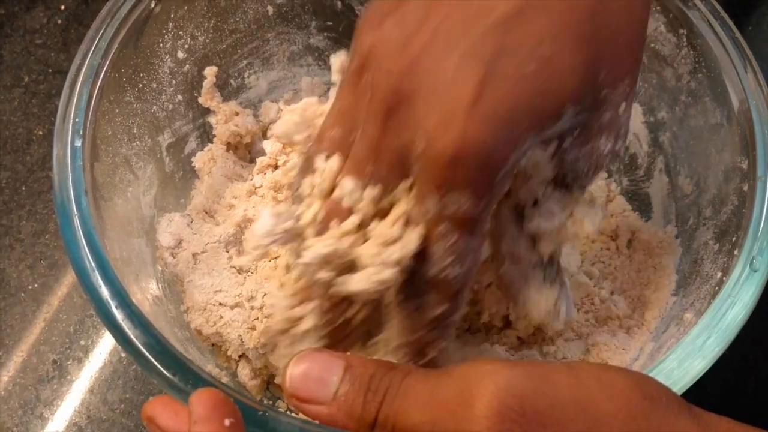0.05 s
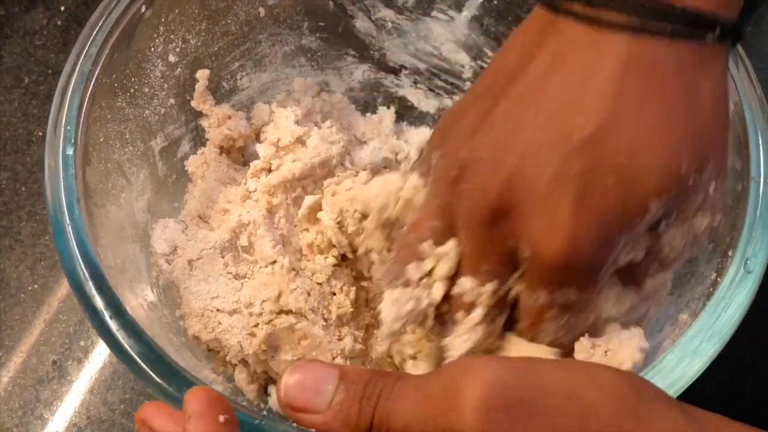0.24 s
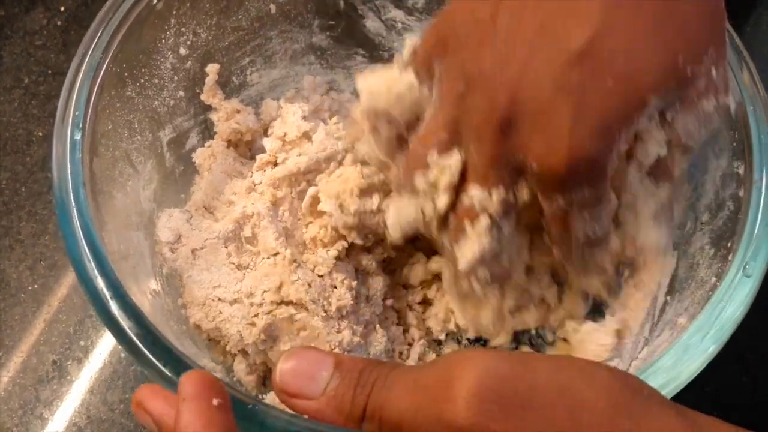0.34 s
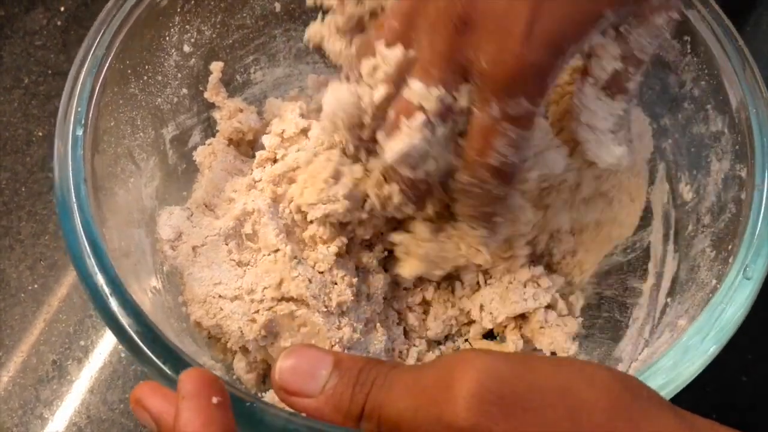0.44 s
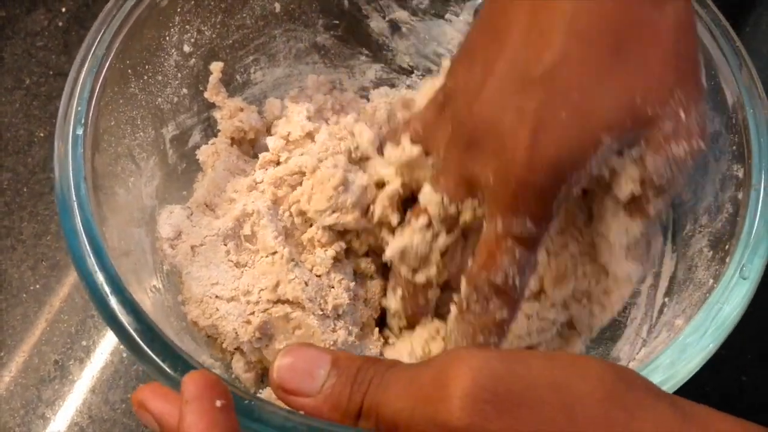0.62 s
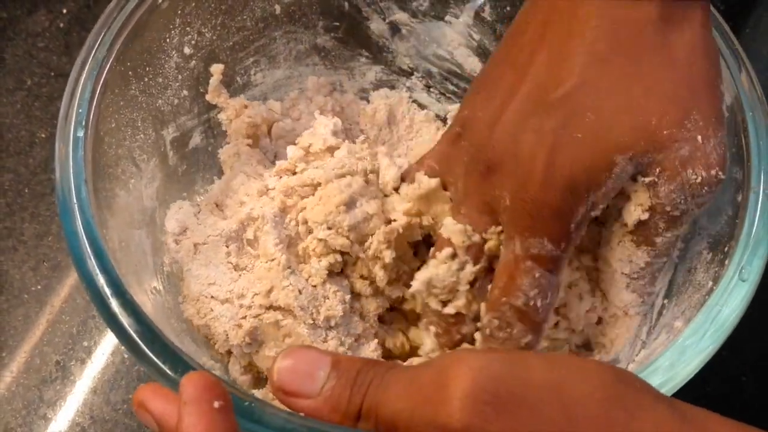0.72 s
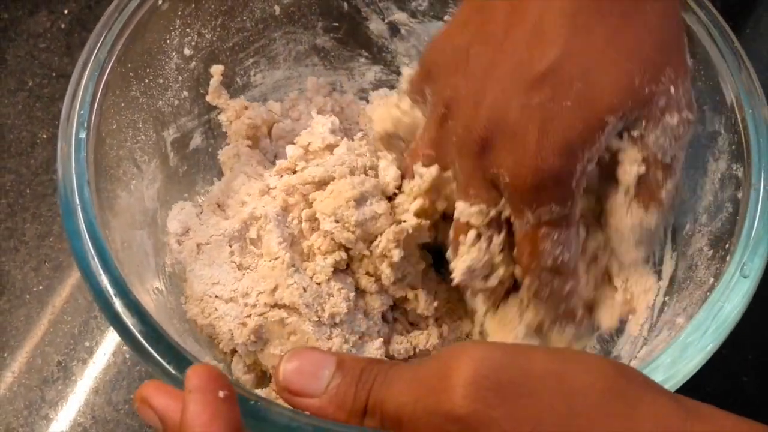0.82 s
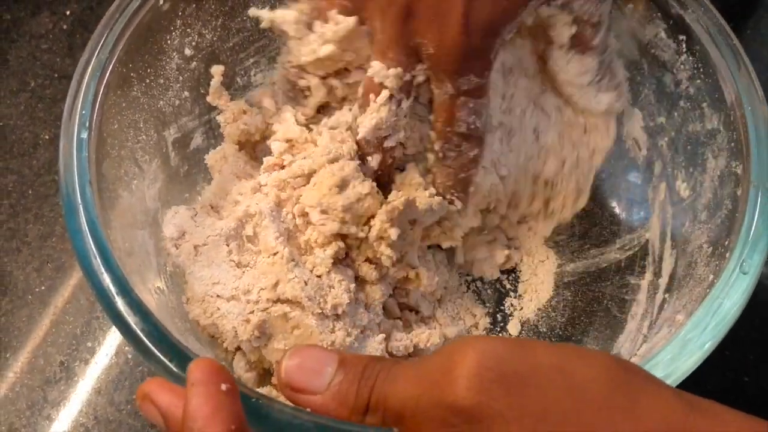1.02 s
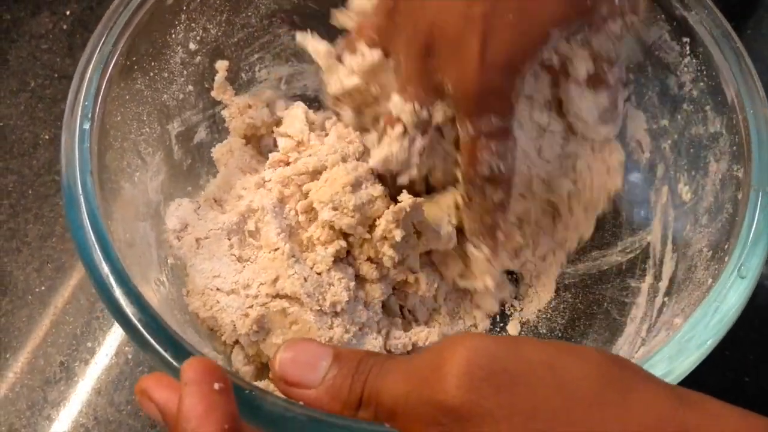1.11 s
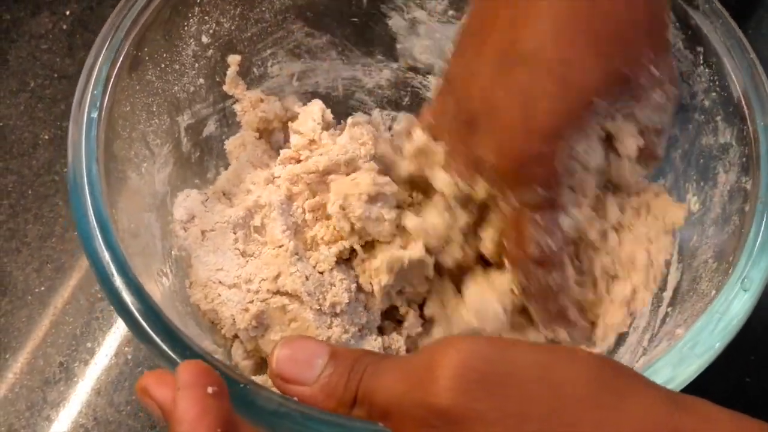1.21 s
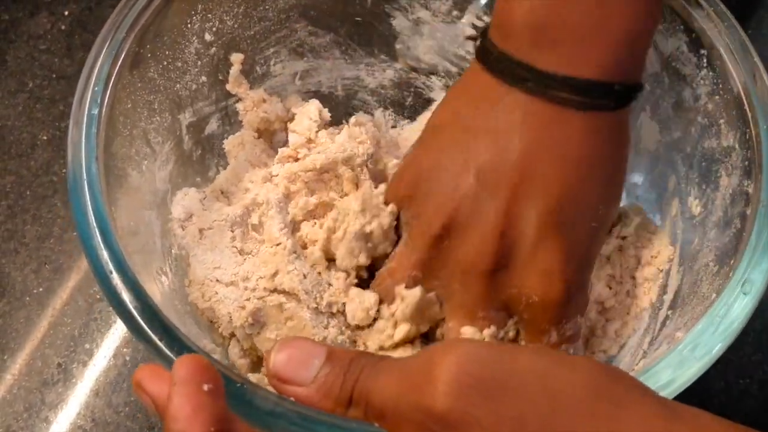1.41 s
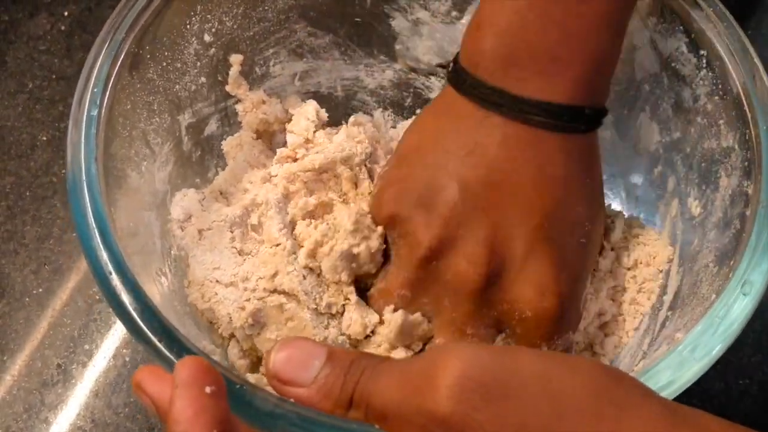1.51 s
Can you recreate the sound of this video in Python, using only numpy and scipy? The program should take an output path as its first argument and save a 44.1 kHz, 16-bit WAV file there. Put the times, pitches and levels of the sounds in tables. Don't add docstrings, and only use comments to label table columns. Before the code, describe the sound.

A hand kneads crumbly dough in a glass bowl with soft rustling and two knocks

```python
import sys
import numpy as np
from scipy import signal
from scipy.io import wavfile

SR = 44100
rng = np.random.default_rng(int(sys.argv[2]) if len(sys.argv) > 2 else 0)


def boost(x):
    u = np.asarray(x, float) / 20
    return 10 ** u


def materialize(psi):
    bounded = np.clip(np.atleast_2d(psi).T, -1, 1)
    quanta = np.round(bounded * 32767).astype(np.int16)
    wavfile.write(sys.argv[1], SR, quanta)


N = 68355
T = np.arange(N) / SR


def rms_one(x):
    return x / np.sqrt(np.mean(x ** 2) + 1e-20)


def at_hz(points, hz):
    points = np.array(points)
    return np.interp(np.log(hz), np.log(points[:, 0]), points[:, 1])


def drift(rate):
    r = np.exp(-80 * np.pi * rate / SR)
    slow = signal.lfilter([1], [1, -2 * r, r * r], rng.standard_normal(N // 40 + 1002))[1000:]
    return np.interp(np.arange(N) / 40, np.arange(len(slow)), rms_one(slow))


def ring(clicks, hz, t60):
    r = boost(-60 / (t60 * SR))
    w = 2 * np.pi * min(hz, .45 * SR) / SR
    return signal.lfilter([0, np.sin(w)], [1, -2 * r * np.cos(w), r * r], clicks + 1e-18)


# f/Hz, correlation
LIKENESS = [(60, 0.89), (180, 0.96), (550, 0.62), (1650, -0.13), (4970, 0.01), (15000, 0.73)]
EDGES = 22 * 2 ** np.arange(0, 9.7, .4)


def bands(white):
    for k, (low, high) in enumerate(zip(EDGES, EDGES[1:])):
        band = signal.butter(2, [low, high], "band", fs=SR, output="sos")
        mid, side = signal.sosfilt(band, white[k % 2])
        hz = np.sqrt(low * high)
        alike = np.clip(at_hz(LIKENESS, hz), -1, 1)
        yield hz, np.sqrt(1 + alike) * mid + np.sqrt(1 - alike) * side * [[1], [-1]]


def coloured(white, spectrum, patchy_db):
    together = drift(7.6)
    out = np.zeros((2, N))
    for hz, pair in bands(white):
        flicker = 1.06 * together + drift(14)
        out += boost(at_hz(spectrum, hz) + patchy_db * flicker) * pair
    return out / np.sqrt(np.mean(out.mean(axis=0) ** 2))


def grains():
    grains_per_s, spread_db, share = 2000, 3.0, .3
    shape = (2, 2, N)
    sizes = boost(spread_db * np.minimum(rng.exponential(1, N), 5))
    sizes = sizes * (rng.random(N) < grains_per_s / SR)
    clicks = rms_one(sizes) * rng.choice([-1, 1], shape)
    return np.sqrt(share) * clicks + np.sqrt(1 - share) * rng.standard_normal(shape)


# t/s, flour hiss level/dB, rub on the glass level/dB, press of the dough level/dB
STROKES = [(0, -68, -70, -92), (.06, -69.5, -68.5, -70), (.2, -56, -61.5, -65.5), (.42, -97, -66, -80),
           (0.478, -54, -61, -55), (.56, -62, -60, -54.5), (0.649, -60.5, -56.5, -67.5),
           (.7, -65.5, -71, -90), (.76, -57, -59, -59.5), (.85, -54, -61, -55.5), (.9, -67, -73, -71),
           (.96, -70, -79, -60.5), (0.998, -51.5, -62.5, -75), (1.078, -54, -54.5, -52),
           (1.18, -57.5, -61, -65.5), (1.27, -60, -63.5, -53.5), (1.33, -67.5, -72.5, -91),
           (1.55, -67.5, -89, -89)]
# f/Hz, level/dB per Hz
HISS = [(2000, -35), (4000, -35), (7000, 6), (12000, 0), (16500, 3)]
# f/Hz, level/dB per Hz
RUB = [(700, -13), (1500, 1.5), (3000, 4), (6000, -3), (10000, 1), (16000, -22)]
# f/Hz, level/dB per Hz
PRESS = [(120, -27), (250, -12.5), (600, 6), (1000, -1.5), (1600, -13), (3000, -31)]


def rustle():
    t, *levels_db = np.transpose(STROKES)
    white = grains()
    out = np.zeros((2, N))
    for k, (db, colour) in enumerate(zip(levels_db, (HISS, RUB, PRESS))):
        shifted = np.roll(white, 999 * k, axis=2)
        out += boost(np.interp(T, t, db)) * coloured(shifted, colour, 1.0)
    return out


# t/s, peak level/dB, f/Hz, ring/cycles
SNAPS = [(.0094, -44, 4620, 73), (.0174, -39.5, 15400, 29), (.612, -49, 14400, 36), (.635, -49, 5000, 41),
         (.848, -47, 3500, 21), (1.2755, -50, 13500, 30), (1.354, -76, 14600, 23), (1.359, -43, 13600, 30),
         (1.3854, -67, 14200, 23), (1.5024, -63.5, 13570, 34), (1.5415, -44.5, 2830, 5.3),
         (1.544, -37, 6650, 10)]


def snaps():
    out = np.zeros(N)
    for t, db, hz, cycles in SNAPS:
        click = np.zeros(N)
        click[int(t * SR)] = boost(db)
        out += ring(click, hz, cycles / hz)
    return out


def knock(hits, modes, contact_hz):
    radiates_above_hz = 231
    push = np.zeros(N)
    for t, db in hits:
        push[int(t * SR)] = boost(db - 3)
    push = signal.sosfilt(signal.butter(2, contact_hz, fs=SR, output="sos"), push + 1e-18)
    push = signal.sosfilt(signal.butter(2, radiates_above_hz, "high", fs=SR, output="sos"), push)
    return sum(boost(db) * ring(push, hz, t60) for hz, db, t60 in modes)


# t/s, peak level/dB
HARD_KNOCK = [
    (.2297, -33.5),
    (.2313, -8),
    (.2333, -7),
    (.2408, -10),
]
# f/Hz, level/dB, t60/s
RIM = [(96.6, -3, 0.069), (173, -7, 0.052), (340, -21, 0.017), (400, -16.5, 0.034), (514, -2, 0.03),
       (609, -1.5, 0.017), (766, 0.5, 0.03), (972, -3, .03), (1204, -1, 0.01), (1540, -24, 0.021),
       (1950, -33, 0.025), (2900, -32, 0.0049), (5076, -29, 0.0086), (6300, 4, 0.071)]


def hard_knock():
    return knock(HARD_KNOCK, RIM, 1050)


# t/s, peak level/dB
SOFT_KNOCKS = [
    (1.2128, -15.5),
    (1.2192, -23.5),
]
# t/s, peak level/dB
THUDS = [
    (1.142, -28),
    (1.158, -34),
]
# f/Hz, level/dB, t60/s
BASE = [(124, -17, 0.027), (178, -7, 0.048), (266.3, -2.5, 0.041), (432, 1.5, 0.0083), (690, -1.5, 0.011),
        (775, -12.5, 0.01), (1174, -1, 0.016), (3300, 3.5, 0.017)]


def soft_knocks():
    return knock(SOFT_KNOCKS, BASE, 656) + knock(THUDS, BASE, 330)


# f/Hz, level/dB per Hz
CRACK = [(2000, 16.5), (3000, 5.5), (3700, -1.5), (6000, 5), (9000, 3), (12000, -3), (14500, -2.5),
         (17000, -9)]


def crack():
    level_db, rise_s, t60_s = -17.5, .0018, .016
    age = T - HARD_KNOCK[1][0]
    rise = (age > 0) * np.minimum(np.abs(age) / rise_s, 1)
    envelope = rise * boost(-60 * np.maximum(age, 0) / t60_s)
    colour = [(1200, -55)] + list(CRACK)
    return boost(level_db) * envelope * coloured(rng.standard_normal((2, 2, N)), colour, 0)


def tick():
    level_db, low_hz, high_hz = 5, 1380, 3500
    click = np.zeros(N)
    click[int(HARD_KNOCK[1][0] * SR)] = boost(level_db)
    band = signal.butter(1, [low_hz, high_hz], "band", fs=SR, output="sos")
    return signal.sosfilt(band, click + 1e-18)


# f/Hz, t60/s
KITCHEN = [(60, 0.19), (100, 0.66), (260, 0.56), (700, 0.45), (1840, 0.54), (4850, .35), (9000, 0.5),
           (15000, 0.38)]


def kitchen(x):
    wet_db, first_wall_s, build_s = 0.5, 0.0029, 0.0017
    age = np.maximum(T[:N // 2] - first_wall_s, 0)
    white = rng.standard_normal((2, 2, 2 * N))[..., N:N + N // 2]
    tail = sum(boost(-60 * age / at_hz(KITCHEN, hz)) * pair for hz, pair in bands(white))
    tail = tail * (1 - np.exp(-age / build_s))
    tail = tail / np.sqrt(np.sum(tail ** 2) / 2)
    return boost(wet_db) * signal.fftconvolve(tail, x[None], axes=1)[:, :N]


def hum():
    hum_hz, level_db, wobble_db, wander_rad = 98.3, -52.5, 1.0, .5
    tone = np.sin(2 * np.pi * hum_hz * T + wander_rad * drift(8))
    tone = tone * boost(wobble_db * drift(8))
    return np.sqrt(2) * boost(level_db) * tone * boost([[.9], [-.9]])


# f/Hz, level/dB per Hz
AIR = [(22, 7.5), (45, -2), (100, -4.5), (250, -4), (700, -16), (1800, -28.5), (5000, -27.5), (16000, -39)]


def room_air():
    return boost(-53.5) * coloured(rng.standard_normal((2, 2, N)), AIR, 1.0)


def scene():
    right_lag_s, knock_pan_db = .0004, 2.5
    soft_room_db = -5.5
    hard, soft = hard_knock(), soft_knocks()
    bowl = hard + soft
    left = bowl * boost(knock_pan_db / 2)
    right = np.interp(T - right_lag_s, T, bowl) * boost(-knock_pan_db / 2)
    echoes = kitchen(hard + boost(soft_room_db) * soft + tick())
    return np.array([left, right]) + crack() + echoes + rustle() + snaps() + hum() + room_air()


def port(x, colour):
    hz = np.linspace(0, SR / 2, 513)
    taps = signal.firwin2(511, hz, boost(2 * at_hz(colour, hz + 1)), fs=SR)
    return signal.lfilter(signal.minimum_phase(taps, n_fft=8192), 1, x)


def band_limit(x):
    return signal.sosfilt(signal.butter(12, 16960, fs=SR, output="sos"), x)


# f/Hz, level/dB
LEFT_PORT = [(300, 0), (1500, 1.5), (6500, 0), (8800, -11), (10800, 0), (13000, 8), (14500, 11), (16000, 5)]
# f/Hz, level/dB
RIGHT_PORT = [(300, 0), (2500, -3), (6500, 0), (8500, -10), (13500, -12), (14500, -16), (15200, -34),
              (16500, -50)]


def record(dry):
    limit, top_hz = .86, 15900
    heard = np.array([port(dry[0], LEFT_PORT), port(dry[1], RIGHT_PORT)])
    heard = heard / limit
    heard = limit * np.tanh(heard ** 3 / 3 + heard)
    heard = signal.sosfilt(signal.cheby2(14, 45, top_hz * 1.015, fs=SR, output="sos"), heard)
    return band_limit(heard)


dry = scene()
out = record(dry)
materialize(out)
```